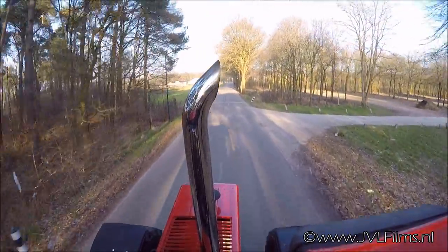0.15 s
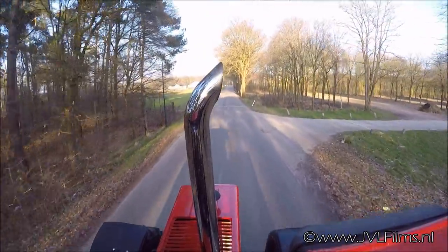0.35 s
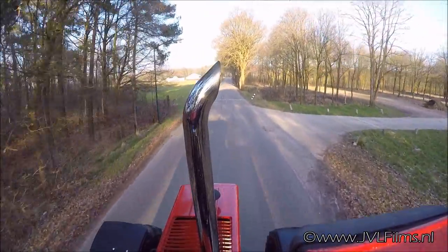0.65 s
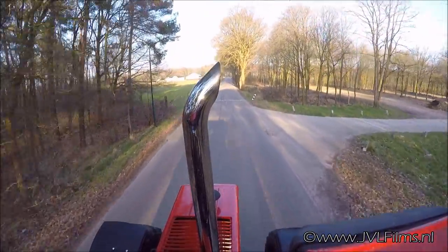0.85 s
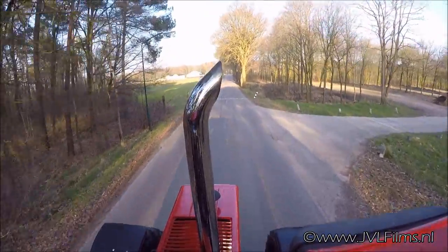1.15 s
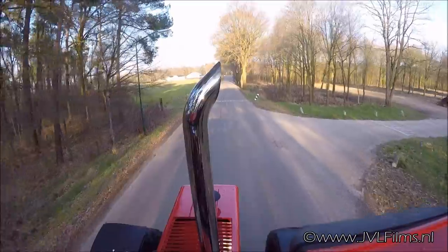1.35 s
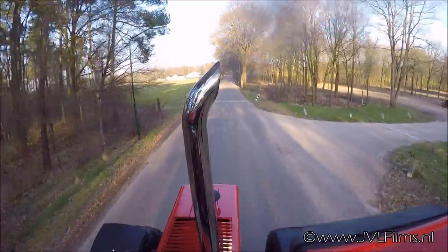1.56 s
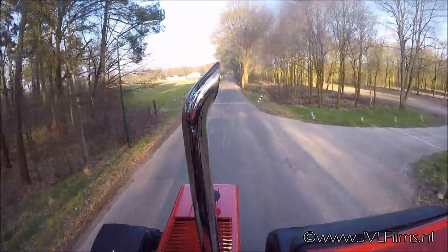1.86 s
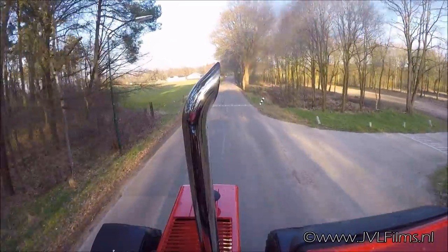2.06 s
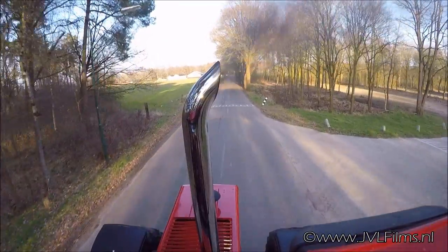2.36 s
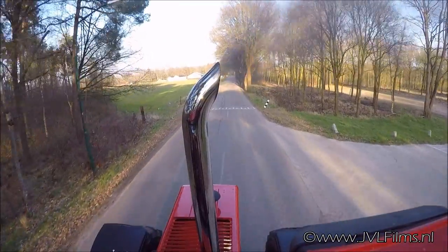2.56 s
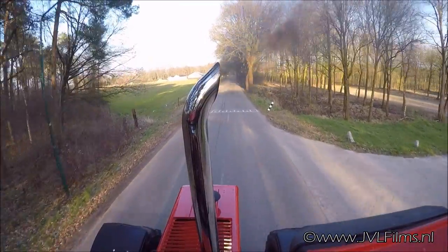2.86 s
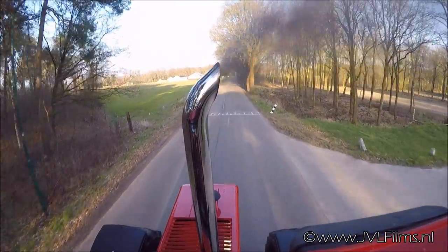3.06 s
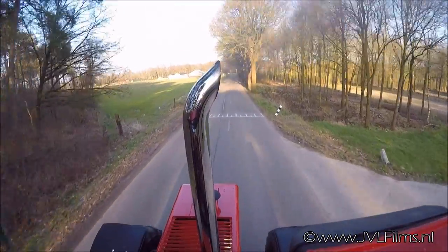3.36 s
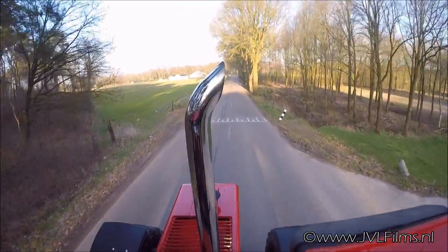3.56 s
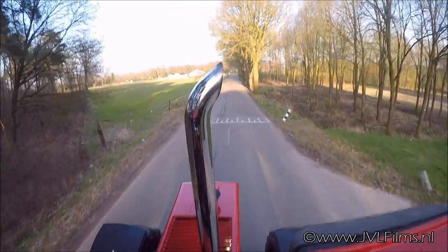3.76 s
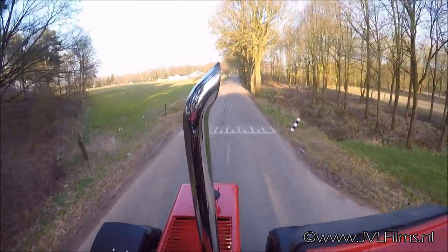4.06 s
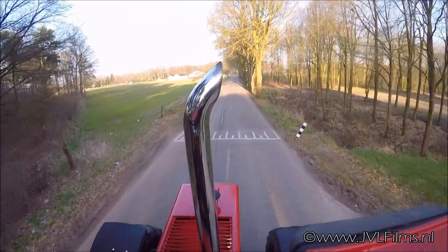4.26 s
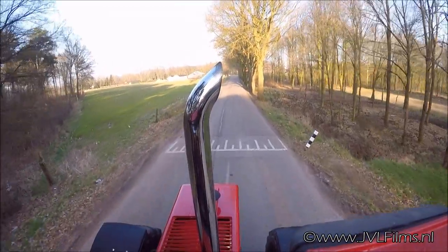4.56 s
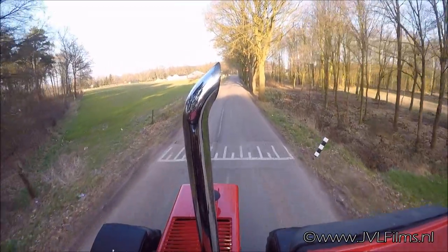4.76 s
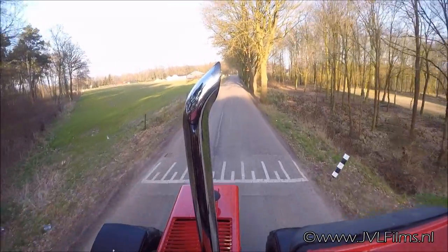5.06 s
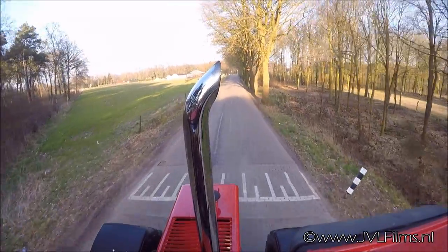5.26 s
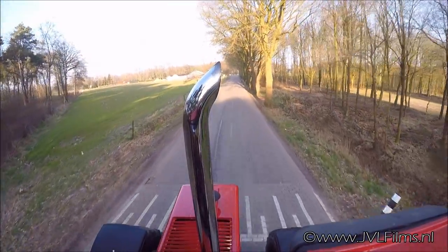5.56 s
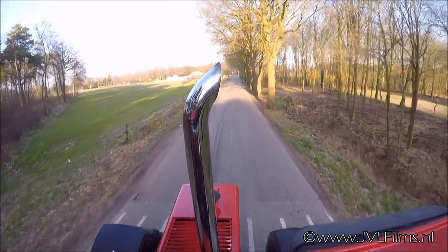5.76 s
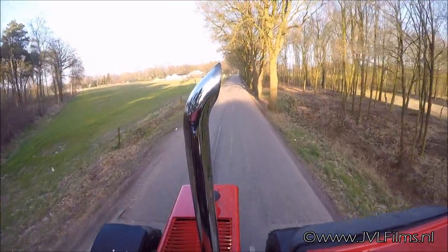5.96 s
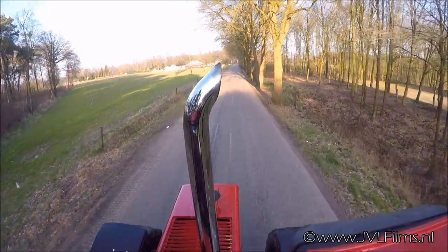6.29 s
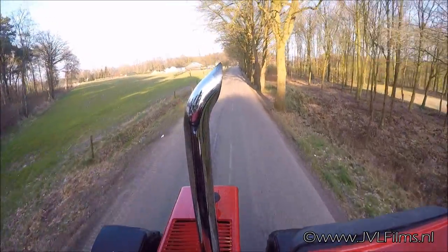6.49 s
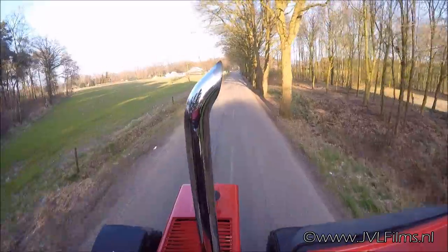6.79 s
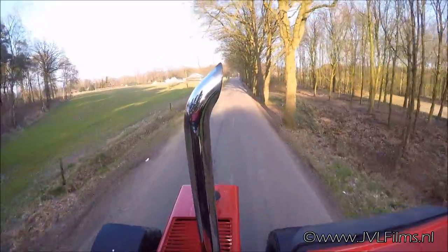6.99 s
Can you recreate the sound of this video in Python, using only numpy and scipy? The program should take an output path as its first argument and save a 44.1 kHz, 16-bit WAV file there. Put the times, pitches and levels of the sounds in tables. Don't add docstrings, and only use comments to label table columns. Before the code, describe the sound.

A diesel tractor rolls along a country road, heard from a boxed microphone on its cab roof. Low cab boom and rumble come first; then the throttle opens, the exhaust puffs and hisses harshly, and a turbo whistle climbs. Around halfway the driver lifts off, the whistle runs down, loose sheet metal chatters, and the engine coasts lower until late jolts bring more rattling.

```python
import sys
import numpy as np
from scipy import signal
from scipy.io import wavfile
from scipy.ndimage import uniform_filter1d

SR = 44100
rng = np.random.default_rng(int(sys.argv[2]) if len(sys.argv) > 2 else 0)


def pcm_store(signal):
    levels = np.round(np.clip(np.atleast_2d(signal), -1, 1) * 32767)
    wavfile.write(sys.argv[1], SR, levels.astype(np.int16).T)


def boost(x):
    u = np.asarray(x, float) / 20
    return 10 ** u


N = 314433
TIME = np.arange(N) / SR
FULL_TORQUE_DB, FULL_GAS_DB = -33, -34


def evened(x):
    return x / np.sqrt(np.mean(x ** 2) + 1e-20)


def noise():
    return rng.standard_normal(N)


def sweep(hz):
    return 2 * np.pi * np.cumsum(hz) / SR


def curves(rows):
    s, *columns = np.transpose(rows)
    return [np.interp(TIME, s, c) for c in columns]


def read(points, hz):
    f, db = np.transpose(points)
    return np.interp(np.log(hz), np.log(f), db)


def bumps_at(rows, shape):
    t = np.arange(0, N, 32) / SR
    total = sum(db * shape(abs(t - s) / half) for s, db, half in rows)
    return np.interp(TIME, t, total)


def peak_at(hz, centre, width, db):
    return db / (1 + (2 * (hz - centre) / width) ** 2)


def colour(x, points=((1, 0), (2, 0)), bumps=()):
    hz = abs(np.fft.fftfreq(2 ** 15, 1 / SR))
    f, db = np.transpose(points)
    db = np.interp(np.log(hz + 1), np.log(f + 1), db)
    db = db + sum(peak_at(hz, *bump) for bump in bumps)
    log_gain = np.log(boost(db))
    taps = np.fft.ifft(np.exp(np.conj(signal.hilbert(log_gain)))).real[:2 ** 14]
    return signal.oaconvolve(x, taps)[:N]


def band(x, lo_hz, hi_hz, order=2):
    sos = signal.butter(order, [lo_hz, min(hi_hz, 18000)], "band", fs=SR, output="sos")
    return signal.sosfilt(sos, x)


def resonate(x, hz, width):
    r, turn = np.exp(-np.pi * width / SR), 2 * np.pi * hz / SR
    return signal.lfilter([0, np.sin(turn)], [1, -2 * r * np.cos(turn), r * r], x)


def slow(seconds):
    size = int(seconds * SR)
    return evened(uniform_filter1d(uniform_filter1d(noise(), size), size))


# time in seconds, firings per second.
FIRING_RATE = [(0.0, 45.71), (0.7, 43.37), (1.27, 43.683), (1.45, 47.367), (1.8, 51.175), (2.3, 55.057),
               (2.8, 58.341), (3.25, 61.446), (3.46, 59.629), (3.56, 53.174), (4.2, 51.036), (5.0, 48.968),
               (5.8, 47.186), (6.45, 46.19), (6.8, 47.804), (7.13, 48.044)]


def firing():
    return 0.06 + np.cumsum(curves(FIRING_RATE)[0]) / SR


def valve(peak, rise, fall, spread_db):
    turns = firing() - peak + 0.5
    u = turns % 1 - 0.5
    size = boost(spread_db * rng.standard_normal(500))[turns.astype(int) + 1]
    return size * np.exp(-0.5 * (u / np.where(u < 0, rise, fall)) ** 2)


# time in seconds, exhaust gas flow in dB, driveline torque in dB.
ENGINE_LOAD = [(0.0, -56, -42), (0.3, -55, -42), (0.55, -50.5, -39), (0.8, -44, -36), (1.22, -45, -40),
               (1.28, -42.5, -37.5), (1.5, -36, -35), (2.5, -33, -33), (2.86, -36.5, -31.5),
               (3.14, -33, -32), (3.38, -38, -36.5), (3.53, -49, -40), (3.8, -49, -42), (4.1, -51, -48),
               (5.0, -59, -42.5), (5.65, -50, -37), (6.0, -49, -40), (7.13, -50, -41.5)]


def load():
    return curves(ENGINE_LOAD)


# time in seconds, note in Hz, level in dB.
CAB_NOTE = [(0.0, 24.86, -15), (0.7, 24.88, -5.5), (1.3, 24.3, -14.5), (1.9, 23.69, -15), (2.44, 23.67, -4),
            (3.2, 23.8, -9.5), (4.0, 24.07, -12), (4.8, 25, -10), (5.3, 24.83, -16), (5.86, 24.8, -10.5),
            (6.2, 24.8, -13), (6.6, 26.16, -12), (6.85, 24.18, -12.5), (7.13, 23.35, -16)]
# time in seconds, depth in dB, half width in seconds.
CANCELLED = [(.06, -3, .04), (.46, -19, 0.11), (.59, -15, 0.027), (.67, -13, 0.01), (.81, -28, 0.043),
             (1.48, -17, 0.059), (1.73, -11, 0.038), (2.24, -14, 0.095), (2.7, -20.5, 0.23),
             (3.51, -31, 0.038), (4.36, -7, 0.12), (4.801, -14, 0.038), (6.51, -14.5, 0.033),
             (6.71, -22, 0.019)]


def cab_boom():
    hz, db = curves(CAB_NOTE)
    db = db + bumps_at(CANCELLED, lambda u: np.exp(-u))
    return np.sqrt(2) * boost(db) * np.sin(sweep(uniform_filter1d(hz, 4000)))


# frequency in Hz, level in dB.
MOUNT_RESPONSE = [(43, -18.5), (49, -16.5), (55, -29.5), (60, -24), (88, -25), (99, -18), (116, -20),
                  (124, -31.5)]
TORQUE_RISE = [1.8, 1.45]
# multiple of the firing rate, level in dB against the pipe level, phase in turns.
PIPE_MULTIPLES = [(3, 6, .3), (5, 0, .1), (6, -6, .4), (7, -12, .7), (9, -8, .2), (10, -12, .6),
                  (11, -9, .8)]


def firing_tones():
    turns, hz = firing(), curves(FIRING_RATE)[0]
    gas_db, torque_db = load()
    pull_db = torque_db - FULL_TORQUE_DB
    first = read(MOUNT_RESPONSE, hz) + TORQUE_RISE[0] * pull_db
    second = read(MOUNT_RESPONSE, 2 * hz) + TORQUE_RISE[1] * pull_db
    pipe_db = -45 + 1.12 * (gas_db - FULL_GAS_DB)
    fourth = pipe_db + peak_at(4 * hz, centre=233.7, width=29, db=12.9)
    parts = [(1, first, 0.43), (2, second, 0.43), (4, fourth, 0.051)]
    parts += [(k, pipe_db + db, phase) for k, db, phase in PIPE_MULTIPLES]
    tones = sum(boost(db + 2.03) * np.cos(2 * np.pi * (round(k) * turns + phase)) for k, db, phase in parts)
    return np.sqrt(2) * tones


# frequency in Hz, level in dB per Hz.
CLATTER_SPECTRUM = [(250, -20.5), (320, -10), (450, -12.5), (1000, -8), (2000, -15.5), (3500, -14.5),
                    (5000, -19), (8000, -34.5), (11000, -46.5), (16000, -41)]


def clatter():
    beat = 2.0 + 0.5 * valve(peak=-0.018, rise=0.068, fall=0.081, spread_db=7.5)
    struck = rng.random(N) < 150 / SR
    knocks = 3 * struck * boost(3.5 * np.minimum(rng.exponential(1, N), 4))
    drive = beat * boost(1.1 * slow(0.033)) * noise() + band(knocks, 670, 5000)
    return boost(load()[1] + 2.0) * evened(colour(drive, CLATTER_SPECTRUM))


def valve_gear():
    torque_db = load()[1]
    tick = (valve(peak=0.33, rise=0.081, fall=0.2, spread_db=2.8) + 0.23) * noise()
    ring_hz = 7780 + 70 * np.minimum(torque_db + 41, 0)
    ring = band(tick, 30, 400) * np.cos(sweep(ring_hz))
    fizz = band(tick, 8400, 13600)
    return boost(0.38 * torque_db - 46.0) * (evened(ring) + boost(-12.0) * evened(fizz))


# low edge in Hz, high edge in Hz, peak of the puff in turns,
# rise in turns, fall in turns, leak between puffs as a share.
JET_BANDS = [(250, 1390, -0.089, 0.067, 0.28, 0.46), (1570, 3670, -0.09, 0.1, 0.2, 0.09),
             (3570, 4450, -0.046, 0.13, 0.14, 0.021), (5940, 8600, -0.18, 0.087, 0.17, 0.13),
             (8800, 22000, -0.14, 0.033, 0.14, 0.16)]
# frequency in Hz, level in dB per Hz.
PUFF_SPECTRUM = [(250, -23.5), (400, -18.5), (540, -11), (1000, -8), (2000, -12.5), (3500, -8.5),
                 (5000, -9.5), (8000, -26.5), (11000, -37), (16000, -44)]


def stack():
    gas_db, jet = load()[0], np.zeros(N)
    common = valve(peak=-0.11, rise=20, fall=20, spread_db=1)
    for lo_hz, hi_hz, peak, rise, fall, leak in JET_BANDS:
        flow = common * valve(peak, rise, fall, spread_db=1.58) + leak
        flow = evened(flow * boost(1.3 * slow(0.00048)))
        bright = boost(0.036 * lo_hz / 1000 * np.minimum(gas_db + 33.5, 0))
        jet += bright * band(flow * noise(), lo_hz, hi_hz)
    shut_db = 2.64 * np.maximum(-47.5 - gas_db, 0)
    return boost(gas_db - shut_db + 10) * evened(colour(jet, PUFF_SPECTRUM))


# frequency in Hz, level in dB.
WHISTLE_LEVEL = [(3830, -56.5), (4100, -50.5), (4300, -48.5), (4600, -53.5), (4950, -58), (5400, -57.5),
                 (6300, -58.5), (9500, -63)]


def turbo():
    spool_s, shift_s = 1.32, 3.37
    creep_hz = 296 / (1 + np.exp((0.99 - TIME) / 0.083))
    spool_hz = 3300 * np.clip(TIME - spool_s, 0, shift_s - spool_s)
    since = np.maximum(TIME - shift_s, 0)
    blow_off = 0.14
    left = (1 - blow_off) * np.exp(-since / 0.83) + blow_off * np.exp(-since / 0.12)
    hz = 3780 + np.minimum(creep_hz + spool_hz, 6400) * left
    sag_hz = -1200 * ((firing() + 0.55) % 1 - 0.5) + 90 * slow(0.003)
    whistle = np.sin(sweep(hz + sag_hz)) * boost(2.0 * slow(0.0012))
    whistle = whistle * valve(peak=-0.07, rise=0.1, fall=0.14, spread_db=2.1)
    return boost(read(WHISTLE_LEVEL, hz) + 2.5) * evened(whistle)


# time in seconds, jolt in dB, half length in seconds, extra on the panels in dB.
ROAD_JOLTS = [(0.295, 5.5, 0.13, -1.5), (0.544, 10.5, 0.08, -6), (0.725, 9, 0.063, 0.5),
              (1.498, 6.5, 0.17, -0.5), (2.06, 8, 0.15, -1), (2.426, 9.5, 0.056, 2), (3.103, 5, .07, -5),
              (3.497, 5.5, 0.089, -2.5), (3.707, 10.5, 0.068, 6), (4.838, 3.5, 0.066, -2),
              (6.3, 3, 0.04, -1), (6.627, 8.5, 0.068, 0.5), (6.832, 14.5, .08, 1)]
# frequency in Hz, level in dB per Hz.
FRAME_BODY = [(10, -14), (32, 9), (48, 5), (62, -1), (90, -2), (113, 6), (130, -4), (150, -15.5),
              (300, -60.5)]
PANEL_BODY = [(80, -51.5), (130, 5.5), (150, -3), (175, 1.5), (205, -3.5), (240, 3.5), (270, -13.5),
              (320, -11), (400, -25), (800, -57)]
THUD_BODY = [(15, -14.5), (30, 4.5), (42, -6), (70, -17.5), (150, -23.5), (200, -26.5), (250, -21.5),
             (290, -40)]


def shaking():
    pull_db = load()[1] - FULL_TORQUE_DB
    jolts, swell = np.array(ROAD_JOLTS), lambda u: np.exp(-0.5 * u ** 2)
    jolt_db = bumps_at(jolts[:, [0, 1, 2]], swell)
    extra_db = bumps_at(jolts[:, [0, 3, 2]], swell)
    frame_db = -26.5 + 0.27 * pull_db + 0.94 * jolt_db
    panel_db = -37.5 + 0.66 * pull_db + 0.81 * jolt_db + extra_db
    thud_db = -44 + 2.18 * jolt_db
    out = np.zeros(N)
    bodies = [(frame_db, FRAME_BODY), (panel_db, PANEL_BODY), (thud_db, THUD_BODY + [(800, -80)])]
    for db, body in bodies:
        out += boost(db) * evened(colour(boost(1.5 * slow(0.008)) * noise(), body))
    return out


# start in seconds, peak in dB, share of high ring in dB, length in seconds.
CHATTER_RUNS = [(0.15, -27.5, -5, 0.03), (0.596, -26.5, 7.5, 0.02), (0.688, -22.5, 1, 0.019),
                (0.783, -18.5, 6.5, 0.0098), (3.586, -22.5, -8, 0.041), (3.644, -18, -5, 0.024),
                (3.661, -6.5, -5.5, 0.017), (3.682, -8, -9, 0.013), (3.711, -15, 3.5, 0.012),
                (3.73, -13, -9, 0.03), (3.748, -16.5, -3.5, 0.023), (3.801, -21.5, 0, 0.019),
                (3.841, -18.5, -17, 0.0089), (3.864, -15.5, -3, 0.0072), (3.894, -22, -3, 0.014),
                (3.915, -18, -14, 0.0097), (4.189, -33.5, 5, 0.015), (4.011, -20, -0.5, 0.018),
                (4.211, -12.5, -6, 0.0083), (6.163, -29.5, 11, 0.013), (6.547, -6, -4, 0.0057),
                (6.624, -13.5, -9, 0.0063), (6.681, -20.5, 4.5, 0.02), (6.696, -10.5, -6, 0.022),
                (6.771, -15.5, -3.5, 0.035), (6.819, -17.5, 2, 0.026), (6.846, -13.5, -9, 0.022),
                (6.875, -22, -2, 0.01), (6.97, -20.5, 4, 0.0094), (7.033, -15.5, -4, 0.017)]
# frequency in Hz, width in Hz, level in dB.
SHEET_LOW = [(526, 34, -3), (603, 28, -6), (820, 200, -34), (1026, 91, 10.5), (1166, 130, 4), (1410, 68, 1)]
SHEET_HIGH = [(1900, 37, -9), (2060, 110, -12), (2399, 110, 9.5), (2660, 55, -7), (2850, 240, -36),
              (3500, 300, -31), (5230, 270, 0.5)]


def ring_modes(x, modes):
    return sum(boost(db) * resonate(x, hz, width) for hz, width, db in modes)


def rattle():
    low, high, t = np.zeros(N), np.zeros(N), np.arange(4000) / SR
    for s, db, high_db, length in CHATTER_RUNS:
        hit, a, b = rng.random((3, len(t)))
        run = (hit < 4000 / SR) * np.minimum(t * 220, 1) * np.exp(-t / max(length, 0.002))
        at = round(s * SR)
        low[at:at + len(t)] += (boost(db) * (2 * a - 1) * run)[:N - at]
        high[at:at + len(t)] += (boost(db + high_db) * (2 * b - 1) * run)[:N - at]
    low = band(ring_modes(low, SHEET_LOW), 626, 2100, order=3)
    high = band(ring_modes(high, SHEET_HIGH), 1500, 5560, order=4)
    return boost(-19) * low + boost(-17.5) * high


# time in seconds, peak in dB, ring in Hz.
MOUNT_TICKS = [
    (0.3137, -56, 11900),
    (0.4509, -51, 11000),
    (3.7294, -51, 11000),
    (4.0058, -49, 11640),
    (5.1088, -60, 11000),
    (6.547, -54, 11900),
    (6.759, -52, 11390),
    (3.965, -32, 3600),
    (3.965, -30, 2310),
    (4.209, -35, 3200),
]


def ticks():
    out, t = np.zeros(N), np.arange(400) / SR
    for s, db, hz in MOUNT_TICKS:
        burst = t * np.exp(-t / 0.0006) * rng.standard_normal(len(t))
        ring = band(burst, hz * 0.8, hz * 1.2)
        out[round(s * SR):][:len(t)] += boost(db + 6.5) * ring / abs(ring).max()
    return out


# frequency in Hz, width in Hz, level in dB.
BOX_MODES = [(493, 16, 4), (638.4, 27, 10.5), (719, 153, -10), (988, 105, 10), (1113, 10, 6), (1171, 13, 3),
             (1259, 39, -12), (1470, 210, -1), (1700, 58, 6), (1704, 65, -13), (1778, 39, 7), (1948, 77, 5),
             (2196, 204, 5.5), (2490, 80, -5), (2860, 46, 6), (3150, 160, -11), (3370, 48, -4.5),
             (3654, 160, -9), (4184, 364, 5.5), (4610, 95, -5.5), (4956, 235, 6.5), (6020, 240, -8),
             (6510, 170, 6.5), (7600, 500, 2.5), (10630, 250, 1), (10700, 1070, 5.5), (12900, 400, -3),
             (14000, 600, -2)]


def scene():
    air = colour(clatter() + valve_gear() + stack() + turbo(), bumps=BOX_MODES)
    mount = cab_boom() + firing_tones() + shaking() + rattle() + ticks()
    return (air + mount)[None]


def top_cut(x):
    return signal.sosfilt(signal.butter(12, 15700, fs=SR, output="sos"), x)


def record(dry):
    soft = 1.186 * np.tanh(dry / 1.17)
    edge = signal.firwin(511, 15200, window=("kaiser", 7), fs=SR)
    mix = signal.oaconvolve(soft, edge[None], "same")
    return top_cut(mix)


dry = scene()
out = record(dry)
pcm_store(out)
```